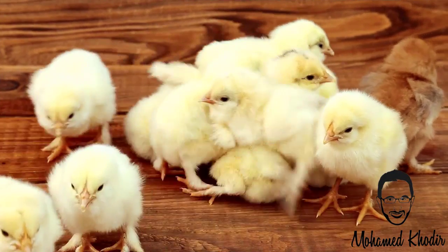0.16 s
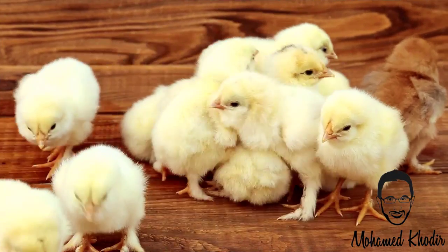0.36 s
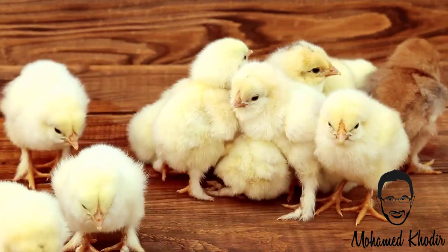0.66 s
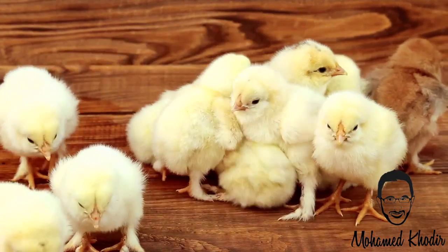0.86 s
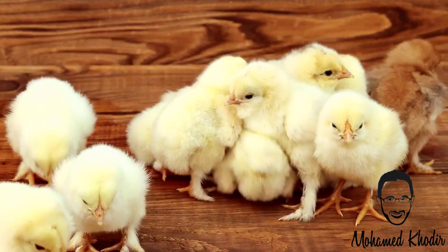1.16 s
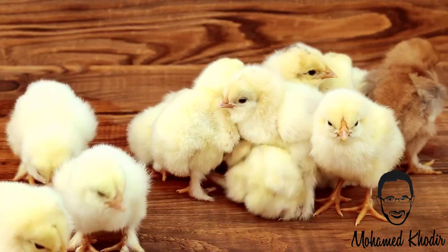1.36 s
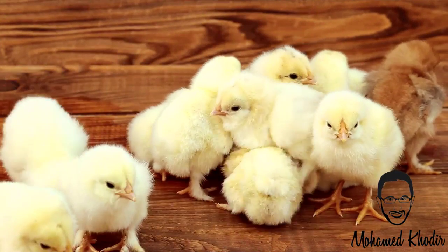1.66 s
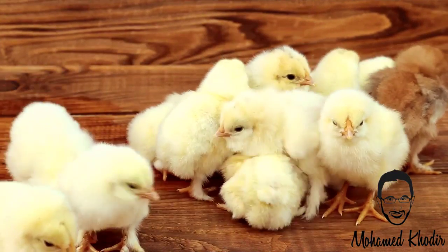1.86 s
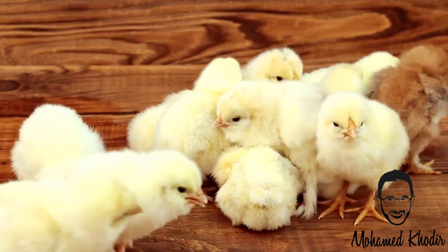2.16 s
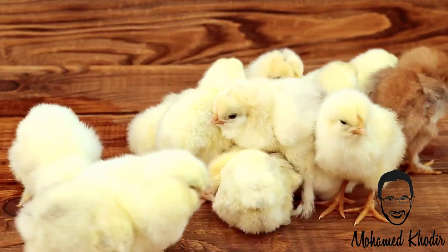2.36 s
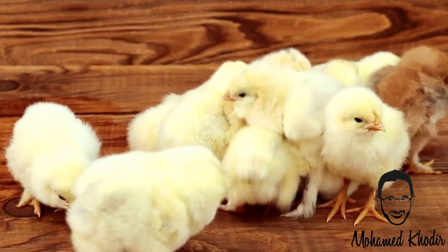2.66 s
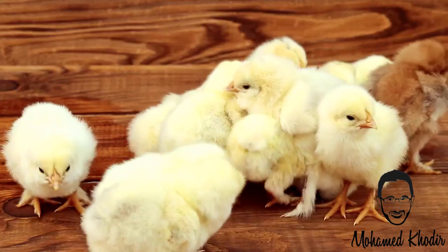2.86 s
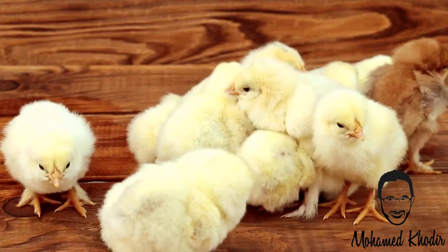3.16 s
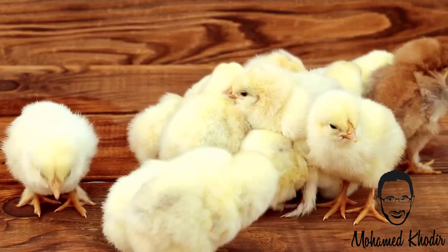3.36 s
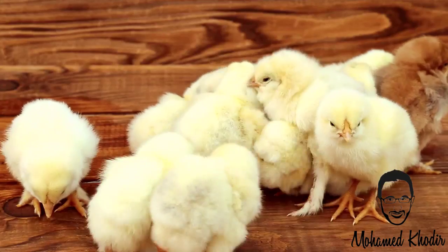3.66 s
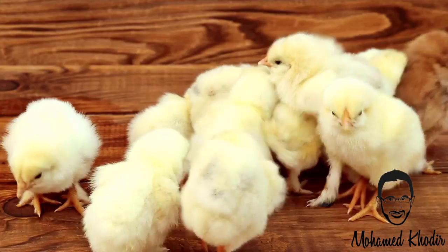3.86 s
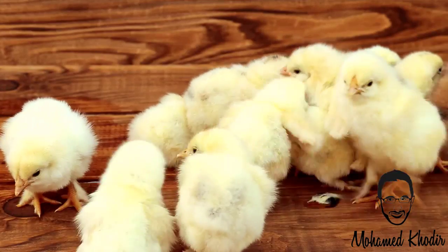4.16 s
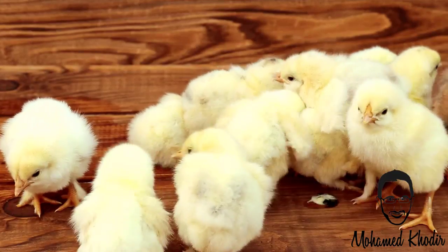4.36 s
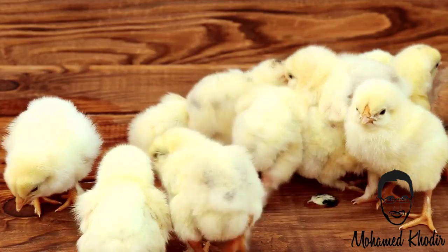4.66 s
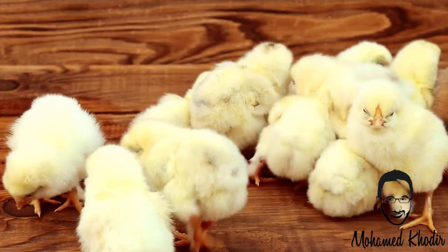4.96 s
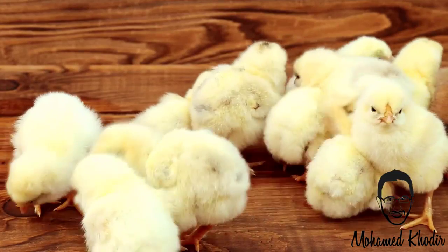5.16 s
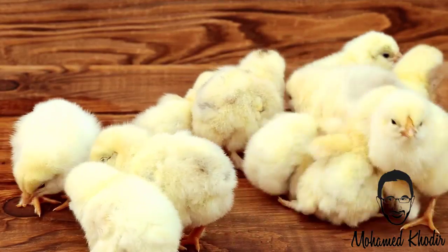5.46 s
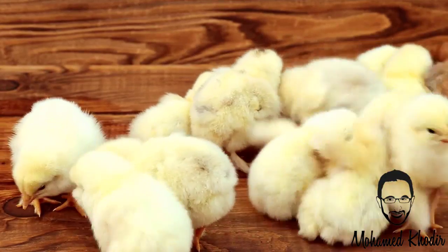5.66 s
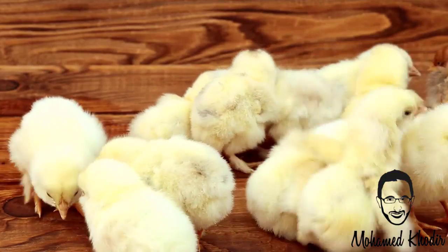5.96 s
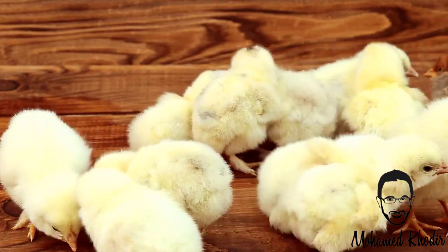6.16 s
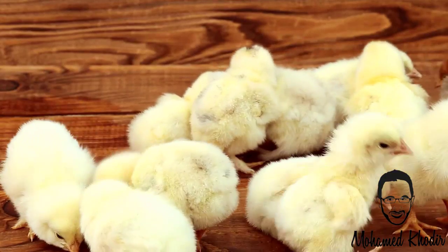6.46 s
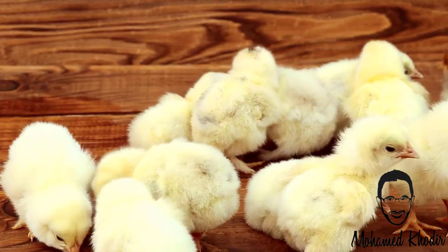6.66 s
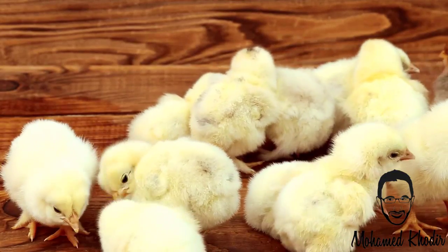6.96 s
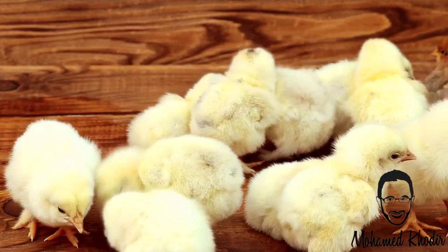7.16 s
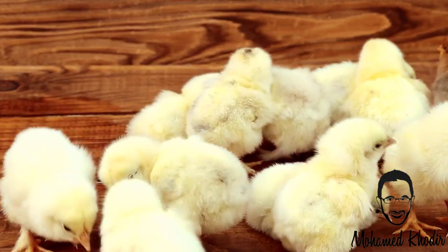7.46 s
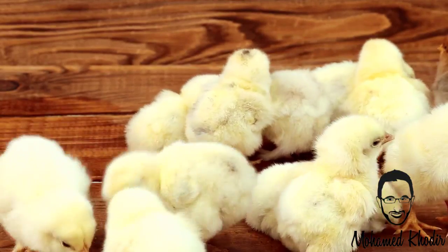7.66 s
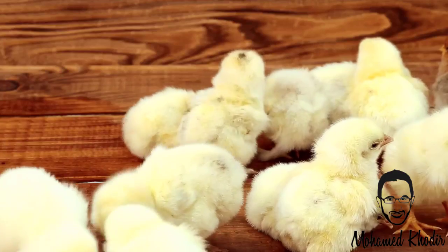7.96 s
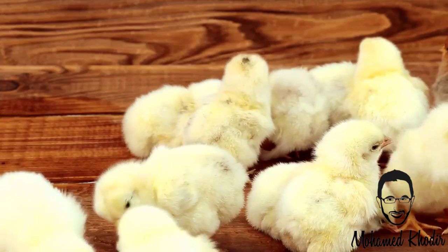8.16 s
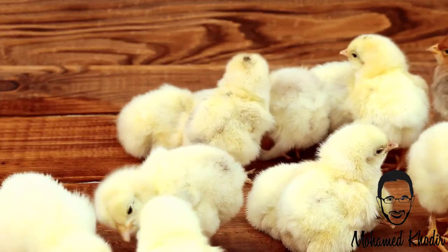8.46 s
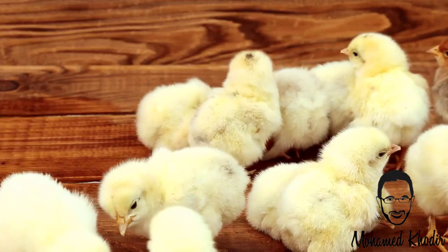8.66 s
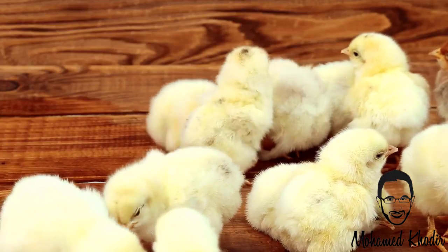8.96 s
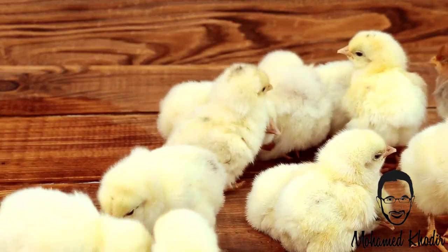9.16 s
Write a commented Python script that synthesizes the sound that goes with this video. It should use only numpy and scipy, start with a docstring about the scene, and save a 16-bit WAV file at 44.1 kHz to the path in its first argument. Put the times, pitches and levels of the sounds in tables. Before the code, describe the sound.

A close huddle of young chicks peeps almost non-stop, shrill and overlapping, with hollow wooden knocks, claw ticks and low rumble beneath.

```python
"""Peeps burst in at once, with a knock on wood: a huddle of young chicks on boards in a small room, close up.
Each peep is a near-sine that leaps to a pitch, sags and falls away, with hoarse noise and faint overtones.
Feet are noise: scraping scuffs and short ticks. Knocks ring decaying board modes, and a low boom swells after.
One thin ping is two decaying sines. Under it all lie shaped noise for rumble and hiss, and a short room echo."""
import sys
import numpy as np
from scipy import signal
from scipy.fft import rfft, irfft, next_fast_len
from scipy.io import wavfile
from scipy.ndimage import uniform_filter1d

SR = 44100
rng = np.random.default_rng(int(sys.argv[2]) if len(sys.argv) > 2 else 0)


def master_out(mix):
    """Clip the mix to full scale and print it as 16-bit PCM to the path in sys.argv[1]."""
    frames = np.transpose(np.atleast_2d(mix))
    ceiling = np.clip(frames, -1, 1)
    pcm = np.round(ceiling * 32767).astype(np.int16)
    wavfile.write(sys.argv[1], SR, pcm)


N = 411453

# Colour of rumble and room hiss, relative: f/Hz, level/dB per Hz
AIR_COLOUR = [(20, -5), (30, -4.5), (60, -4.5), (100, -8), (160, -17), (300, -25.5), (500, -36.5),
              (1500, -42.5), (3400, -57.5), (5500, -64), (9000, -61), (15500, -78)]
# Colour of the scraping grains, relative: f/Hz, level/dB per Hz
SCRAPE_COLOUR = [(300, 8.5), (600, 12.5), (1500, 9.5), (3300, 18), (5400, 11.5), (8000, -0.5), (12000, -3),
                 (15500, -10)]
# Scuffs of feet and down on the wood: t/s at the peak, relative level/dB, fade/ms per 10 dB
SCUFFS = [(0.0, -37.5, 5), (0.473, -46, 34), (.68, -51, 147), (.862, -46.5, 73), (0.963, -38.5, 9),
          (1.047, -51, 206), (1.874, -50.5, 149), (2.105, -53, 58), (2.28, -51.5, 44), (2.456, -47.5, 76),
          (2.74, -45.5, 68), (2.892, -51.5, 96), (3.383, -47, 62), (3.74, -56, 30), (3.93, -51, 70),
          (4.444, -49.5, 36), (4.535, -42, 23), (4.806, -56, 69), (5.372, -50.5, 56), (5.453, -43, 42),
          (5.693, -46, 91), (5.928, -50, 89), (6.337, -44.5, 61), (6.581, -55.5, 147), (6.926, -57, 60),
          (7.191, -48.5, 85), (7.312, -52, 40), (7.677, -47.5, 41), (7.818, -48.5, 144), (7.983, -44.5, 40),
          (8.038, -43, 29), (8.158, -51.5, 105), (8.268, -44, 32), (8.907, -54, 96), (9.045, -50, 64),
          (9.211, -52.5, 82)]
# Claw ticks: t/s, relative level/dB, relative wood share/dB
CLAW_TICKS = [(0.4708, -50, -16), (0.965, -40, 12.5), (1.0514, -51, -6), (1.4651, -49, 21.5),
              (2.0983, -48.5, 9), (2.4184, -49, -3), (3.374, -40, -27), (4.4368, -51, -16.5),
              (4.5256, -46.5, 3), (5.694, -53, 6), (6.9272, -46.5, -10), (7.0111, -46.5, 23.5),
              (7.1547, -45.5, -8), (7.6712, -45.5, 3), (7.9753, -43, -16), (8.043, -48, -4)]
# Knocks on the boards: t/s, then relative level/dB, bass share/dB, crack share/dB, each trimmed in the mix
KNOCKS = [(0.013, -18.5, -16, -4.5), (0.926, -11, -13, -14), (1.044, -23.5, -5, -26),
          (1.458, -13.5, -21, -24), (1.961, -31, 2.5, -32), (2.119, -30.5, -9, -17), (2.89, -33, -2, -28),
          (6.065, -25, -6.5, -15), (6.694, -22, -17.5, -13.5), (6.92, -31.5, -3.5, -25),
          (7.015, -3, -16.5, -18.5), (7.728, -32, -10, 0), (8.1, -28, 4, -33), (8.913, -38.5, 2.5, 0),
          (8.99, -28, -8.5, -10), (9.196, -31, -8.5, -21)]
# Board ring before the random detune of each knock: f/Hz, level/dB, t60/s
BOARD_MODES = [(138, 0, 0.086), (224.4, -10, 0.15), (280, -5.5, 0.1), (350, 0, 0.085), (395, -6, 0.06),
               (507, -4, 0.097), (576, -5, 0.085), (657, -7, .09), (797, -11, 0.079)]
# Floor boom that comes late and stays: f/Hz, level/dB, t60/s
BOOM_MODES = [(52, -8, 1), (65.97, -4, 1), (88.9, 1.5, 0.64), (119.4, -5, 0.68), (169.1, -7.5, 0.54)]
# Ring of the thin bright ping: f/Hz, level/dB, t60/s
PING_MODES = [(6024, -39, 0.13), (9959, -51, 0.15)]
# One row a peep: t/s, length/ms, f/Hz at onset, top, start of the fall and end (before smoothing and waver),
# bend of the sag (under 1 early, over 1 late), level/dB at top, mid-sag, start of the fall and end
# (before flutter), upper line/dB against the note
PEEPS = [(0.0,91,3722,3557,3140,2100,2.9,-18,-19.5,-30,-37,-13),
         (0.0,152.4,4027,4080,3247,1934,1.3,-21.5,-21.5,-13.5,-26.5,-16),
         (.104,107.2,3900,3880,3430,1970,1.13,-23.5,-27,-25,-31,-14),
         (.192,81,5130,4900,3980,3870,2.2,-38,-31,-40,-43,-22),
         (.199,129.7,3540,3725,3565,2054,2.4,-21,-14,-19,-21,-30),
         (.334,103.8,3400,4160,3510,2070,0.5,-28.5,-28.5,-26.5,-33,-13),
         (0.514,197.1,3430,4090,3266,1894,1.6,-22.5,-22.5,-18.5,-26,-16),
         (.789,166.7,3910,4140,3236,1950,2.2,-21.5,-19.5,-19,-22.5,-20),
         (.894,102.8,3224,3604,3290,2280,1.7,-19,-24,-23.5,-40,-16),
         (1.064,118.8,3160,3622,3280,2190,1.35,-20.5,-21.5,-27,-30,-22),
         (1.089,133.8,4150,4295,3100,2390,1.6,-25,-31.5,-30,-26,-13),
         (1.105,181,5200,5850,2394,2400,.75,-42,-29,-31,-31,-30),
         (1.289,128.7,3350,3747,3450,2170,3.6,-24,-20.5,-22.5,-29,-37),
         (1.383,147,5550,5450,3450,1890,0.49,-39.5,-28,-24.5,-24,-14.5),
         (1.609,142.2,2890,3800,3215,2220,0.66,-25,-25.5,-20.5,-37,-14.5),
         (1.683,170,4200,4335,3060,1940,1.73,-23.5,-25,-25,-24.5,-20),
         (1.838,139,3380,3990,3190,2150,0.72,-23,-23.5,-21.5,-38,-28.5),
         (1.944,155.2,3530,3850,3406,2310,1.64,-26,-21,-23.5,-30,-35),
         (2.024,125,4040,4250,3214,2010,0.91,-24.5,-25,-26,-19,-30),
         (2.084,129,3800,4050,3370,1910,1.03,-27,-24,-23.5,-22.5,-11.5),
         (2.183,164,3590,3791,3200,2167,3.3,-23,-19,-18,-26,-43),
         (2.285,69.2,4680,4800,3840,3800,1.6,-40,-31,-39,-40,-14),
         (2.311,115.8,5950,5100,3030,2650,.3,-32,-29,-33,-36,-25),
         (2.631,184,3880,4585,3513,1990,0.53,-27.5,-25,-21,-17,-18),
         (2.699,167,3376,3894,2978,2340,2.2,-25,-30,-16.5,-30,-10.5),
         (2.744,141,3553,3863,3015,2266,0.93,-34,-25,-26.5,-18.5,-24),
         (2.8,136,5140,4920,3140,1964,0.94,-40,-28,-23.5,-19.5,-15),
         (2.898,157,4060,4660,3390,2030,0.74,-32,-26,-25,-24.5,-19),
         (2.937,136.4,5320,5080,2870,2800,1,-40,-36,-38,-38,-25),
         (3.164,188.7,3220,3760,3120,2130,1.31,-25.5,-25,-19,-31,-19),
         (3.303,178,3850,4167,3050,1910,2.3,-23.5,-23,-17.5,-34,-32),
         (3.893,142,4290,4660,4070,2320,1.04,-38,-31,-30,-20,-16.5),
         (3.973,126,4900,4090,3575,2174,3.2,-38,-25,-26,-20.5,-20),
         (4.049,149.5,3850,3863,3080,2128,2.1,-24,-26.5,-16.5,-22.5,-36),
         (4.089,154.3,3750,3740,2610,2610,1.2,-24.5,-35,-44,-45,-32),
         (4.34,124,2810,3725,2900,2530,1.3,-27,-28,-23,-31,-22),
         (4.454,122.5,3750,3960,3700,2250,3.95,-20.5,-21,-23.5,-29.5,-36),
         (4.583,124.4,3570,3714,3270,2050,1.54,-22,-21,-18.5,-31.5,-20),
         (5.152,114.7,3413,4080,3496,3480,1.12,-26.5,-22,-21,-19,-17.5),
         (5.218,112.8,3070,3605,2810,2167,2.15,-25.5,-27.5,-22,-26,-17),
         (5.245,137.7,4570,4110,3295,2030,1.67,-32,-25,-24,-28.5,-22.5),
         (5.624,190,3183,4560,3386,1807,1.4,-28,-22.5,-19.5,-19.5,-42),
         (5.764,89.9,2844,3730,3476,2310,1.6,-24.5,-30,-26,-25,-8),
         (6.031,138.1,2720,3798,3450,2104,4.1,-28,-32,-23.5,-24.5,-43),
         (6.118,141,4750,4660,3450,1860,0.6,-34.5,-27,-25.5,-23.5,-16),
         (6.33,215,4000,4204,3250,1910,1.05,-24,-21.5,-19,-28,-15.5),
         (6.561,87,3550,3910,3340,2250,1.5,-38,-44,-29,-35.5,-17),
         (6.629,194,3500,4065,3050,1927,3.2,-21,-19,-16,-20,-33),
         (6.715,70,5900,5000,4050,4000,.8,-38,-32,-34,-36,-25),
         (6.95,111.5,3030,3840,3210,2760,1.86,-26.5,-26,-30.5,-39,-45),
         (7.129,151.2,3360,3990,3320,2140,0.95,-23,-23.5,-24,-29,-39),
         (7.196,89,5100,4630,2820,2760,0.99,-39,-34,-40,-41,-15),
         (7.36,95.7,3310,3897,3620,1980,3.4,-21,-20,-21,-36,-31),
         (7.383,139.4,3882,3840,3300,2026,4,-32.5,-17.5,-20.5,-23,-30),
         (7.422,141,3980,4290,3930,3880,0.77,-27,-30,-29,-29,-34),
         (7.508,123,3730,3704,2714,1960,1.46,-24.5,-17,-22,-16,-22),
         (7.552,101,4850,5110,2660,2600,.7,-35,-32,-39,-39,-24),
         (7.722,190.6,3220,4160,3180,1984,2.57,-28.5,-23.5,-19,-24,-19),
         (8.141,134,3046,3843,3230,2623,1.5,-26.5,-28.5,-30,-44,-25),
         (8.151,102,4060,4160,2670,2400,0.85,-32.5,-37,-29,-30,-19),
         (8.346,89,3720,4010,3360,1860,1.8,-26,-26,-25,-27,-17),
         (8.358,139.6,3084,3810,3314,2075,1.64,-24,-21,-25.5,-31,-37),
         (8.463,192.3,4040,4120,3040,1917,1.75,-30,-24,-18.5,-27.5,-29),
         (8.849,187,3242,4281,3340,2075,.95,-27,-33,-19.5,-23,-23),
         (8.894,205,3236,3780,3100,2240,1.5,-22,-27.5,-21,-31.5,-10.5),
         (8.958,104,4590,4770,2680,2680,0.98,-37,-36,-34,-34,-24),
         (9.147,121,4113,4230,3570,1838,0.84,-25,-31,-24,-23,-21),
         (9.152,65,4820,4800,4350,4300,1.6,-39,-40,-36,-37,-26),
         (9.199,134,3313,3710,3290,3305,2.7,-21,-24,-20,-20,-14)]
# How the open beak passes overtones, falling steeply to 8 kHz, then rising a little: f/Hz, level/dB
BEAK = [(4000, 17.5), (6500, -1), (8200, -11.5), (13000, -6)]

AIR_DB = -41.5  # before its slow wander
STIR_DB = -66  # floor of the shuffle level: the huddle never lies quite still
SCUFF_RISE = 0.85  # rise time as a share of the fade time
PING_S = 7.666
LEAP_S, LEAP_BEND = .024, 3.0  # onset to top; most of the leap comes at once
FALL_HZ_PER_S = 45000  # speed of the closing fall
HOARSE_RATIO = 1.05  # a hoarse band rides just above the note
UPPER_RATIO, UPPER_SPREAD_PER_DB = .97, .0105  # upper line over the note; the fainter, the higher
OCTAVE_DB = -33.5  # overtones, before the patches and the beak
TOP_HZ = 15700


def undb(db):
    """Decibels to amplitude."""
    return 10 ** (np.asarray(db) / 20)


def unit(x):
    """Scale to rms 1."""
    return x / np.sqrt(np.mean(x ** 2))


def colour(x, points):
    """Shape a sound by (Hz, dB) points on a log-frequency axis."""
    size = next_fast_len(len(x))
    hz = np.maximum(np.arange(size // 2 + 1) * SR / size, 1)
    at_hz, db = np.transpose(points)
    gain = undb(np.interp(np.log(hz), np.log(at_hz), db))
    return irfft(rfft(x, size) * gain, size)[:len(x)]


def band(x, lo_hz, hi_hz):
    """Band-pass filter."""
    return signal.sosfilt(signal.butter(2, [lo_hz, hi_hz], "bandpass", fs=SR, output="sos"), x)


def walk(rate):
    """Random levels held 1 / rate s and slewed twice; rms 1."""
    hold = int(SR / rate)
    steps = np.repeat(rng.standard_normal(N // hold + 1), hold)
    slewed = uniform_filter1d(uniform_filter1d(steps, hold), hold)
    return unit(slewed[:N])


def fade(t, t60):
    """Exponential decay by 60 dB in t60 s."""
    return undb(-60 * t / t60)


def ring(modes, phases, length_s):
    """Sum of decaying sine modes; phases in turns."""
    t = np.arange(int(length_s * SR)) / SR
    return sum(undb(db) * np.sin(2 * np.pi * (hz * t + phase)) * fade(t, t60)
               for (hz, db, t60), phase in zip(modes, phases))


def add(out, x, s):
    """Mix x into out from time s."""
    i = int(s * SR)
    out[i:i + len(x)] += x[:len(out) - i]


def air():
    """Low rumble and the faint hiss of the room: shaped noise whose level wanders slowly."""
    noise = unit(colour(rng.standard_normal(N), AIR_COLOUR))
    return noise * undb(AIR_DB + 1.5 * walk(3))


def shuffle(grain_db=2.6):
    """Dense uneven scraping grains that swell and fade with each scuff."""
    t_ms = np.arange(N) / SR * 1000
    # each grain lasts 130 samples, about 3 ms
    strength = np.minimum(rng.exponential(1, N // 130 + 1), 5.0).repeat(130)[:N]
    grains = rng.standard_normal(N) * undb(grain_db * strength)
    scrape = colour(unit(grains), SCRAPE_COLOUR) * undb(2.36 * walk(35))
    level_db = np.full(N, float(STIR_DB))
    for s, db, fade_ms in SCUFFS:
        late = (t_ms - s * 1000) / fade_ms
        level_db = np.maximum(level_db, db - 10 * np.maximum(late, -late / SCUFF_RISE))
    return scrape * undb(level_db)


def ticks(bright_t60=0.038, wood_t60=0.099):
    """Claws touch the wood: a bright scratchy tick and a dull tap, both decaying bands of noise."""
    out, t = np.zeros(N), np.arange(int(.08 * SR)) / SR
    for s, db, wood_db in CLAW_TICKS:
        noise = rng.standard_normal((2, len(t)))
        bright = band(noise[0], 2500, 14000) * fade(t, bright_t60)
        wood = unit(band(noise[1], 330, 1300)) * fade(t, wood_t60)
        add(out, undb(db + 2.5) * (bright + undb(wood_db - 5.0) * wood), s)
    return out


def knocks(push_s=.0004, spread_s=0.019, boom_rise_s=.03, detune=0.1, crack_t60=0.11):
    """A short rattling contact rings the boards; the floor boom swells in after it."""
    out, t = np.zeros(N), np.arange(int(.15 * SR)) / SR
    for s, db, bass_db, crack_db in KNOCKS:
        phases, chance = rng.random((2, len(BOARD_MODES) + len(BOOM_MODES)))
        noise = rng.standard_normal((2, len(t)))
        contact = uniform_filter1d(noise[0], max(int(push_s * SR), 1)) * np.exp(-t / spread_s)
        # each knock detunes the modes a little at random
        detuned = [(hz * (1 + detune * (c - .5)), mode_db, t60)
                   for (hz, mode_db, t60), c in zip(BOARD_MODES, chance)]
        board = signal.fftconvolve(ring(detuned, phases, 0.36), contact)
        add(out, undb(db - 4.0) * board / np.abs(board).max(), s)
        crack = unit(band(noise[1], 390, 2000)) * fade(t, crack_t60)
        add(out, undb(db + crack_db - 7.0) * crack, s)
        boom = ring(BOOM_MODES, phases[len(BOARD_MODES):], 1.2)
        boom *= 1 - np.exp(-np.arange(len(boom)) / SR / boom_rise_s)
        add(out, undb(db + bass_db + 3.5) * boom, s)
    return out


def ping():
    """One thin bright ping: two high sine modes dying away."""
    out = np.zeros(N)
    add(out, ring(PING_MODES, rng.random(2), .3), PING_S)
    return out


def peep_pitch(t, length, onset_hz, top_hz, knee_hz, end_hz, bend):
    """Pitch leaps to the top, sags on a bent line and falls away; also gives the start of the fall."""
    fall = max(knee_hz - end_hz, 1) / FALL_HZ_PER_S
    knee = length - fall
    leap = (top_hz - onset_hz) * np.clip(1 - t / LEAP_S, 0, 1) ** LEAP_BEND
    along = np.clip((t - LEAP_S) / (knee - LEAP_S), 0, 1)
    sag = (top_hz - knee_hz) * along ** bend
    drop = (knee_hz - end_hz) * np.clip((t - knee) / fall, 0, 1)
    # about 7 ms of smoothing rounds the corners
    return uniform_filter1d(top_hz - leap - sag - drop, size=300, mode="nearest"), knee


def peeps(flutter_db=2.5, waver=.007, attack_s=0.0015, release_s=0.009, onset_db=-3, twelfth_db=-19,
          hoarse_db=-16):
    """Near-sine whistles that flutter in level and waver in pitch, hoarse, with a weaker line above."""
    out, flutter, drift, patch = np.zeros(N), walk(260), walk(400), walk(30)
    unsteady, hoarse = walk(200) + 1j * walk(200), walk(700) + 1j * walk(700)
    beak_hz, beak_db = np.transpose(BEAK)
    for s, ms, onset_hz, top_hz, knee_hz, end_hz, bend, *db, upper_db in PEEPS:
        length = ms / 1000
        i = np.arange(int(s * SR), min(int((s + length) * SR), N))
        t = i / SR - s
        here = i - rng.integers(N)  # a random stretch of the walks; negative places wrap round
        pitch, knee = peep_pitch(t, length, onset_hz, top_hz, knee_hz, end_hz, bend)
        turn = 2 * np.pi * np.cumsum(pitch * (1 + waver * drift[here])) / SR
        hoarse_band = np.imag(hoarse[here] * np.exp(1j * HOARSE_RATIO * turn))
        tone = np.sin(turn) + undb(hoarse_db) * hoarse_band
        # the upper line dies away in the second half
        upper = undb(upper_db) * np.clip(2 * (1 - t / length), 0, 1)
        upper_ratio = min(UPPER_RATIO - UPPER_SPREAD_PER_DB * upper_db, 1.21)
        tone += upper * np.imag(unsteady[here] * np.exp(1j * upper_ratio * turn))
        # the overtones come and go in patches
        over_db = OCTAVE_DB + 6.0 * np.minimum(patch[here], 1.5)
        for order, rel_db in ((2, 0), (3, twelfth_db)):
            through_beak_db = np.interp(order * pitch, beak_hz, beak_db)
            tone += undb(over_db + rel_db + through_beak_db) * np.sin(order * turn)
        edge = np.clip(np.minimum(t / attack_s, (length - t) / release_s), 0, 1)
        level_times = [0, LEAP_S, (LEAP_S + knee) / 2, knee, length]
        loud_db = np.interp(t, level_times, [db[0] + onset_db, *db])
        loud_db += flutter_db * np.minimum(flutter[here], 1.6)
        out[i] += np.sqrt(2) * edge * undb(loud_db) * tone
    return out


def room(x, near_db=-3.0, near_t60=0.077, far_db=-14.0, far_t60=0.42):
    """Close bounces off the boards and the other birds, then a weak tail from the walls, as fading noise."""
    t = np.arange(int(.6 * SR)) / SR
    near, far = rng.standard_normal((2, len(t)))
    near = near * fade(t, near_t60) * (t > .002)
    far = far * fade(t, far_t60) * (t > .008)
    echo = undb(near_db) * near / np.linalg.norm(near) + undb(far_db) * far / np.linalg.norm(far)
    return x + signal.fftconvolve(x, echo)[:N]


def scene():
    """Air, shuffle and knocks stay dry; ticks, ping and peeps sound in the room."""
    bed = air() + shuffle() + knocks()
    return (bed + room(ticks() + ping() + peeps()))[None]


def record(dry):
    """The recorder cuts the top with a steep low-pass."""
    return signal.sosfilt(signal.ellip(8, .2, 70, TOP_HZ, fs=SR, output="sos"), dry)


dry = scene()
out = record(dry)
master_out(out)
```